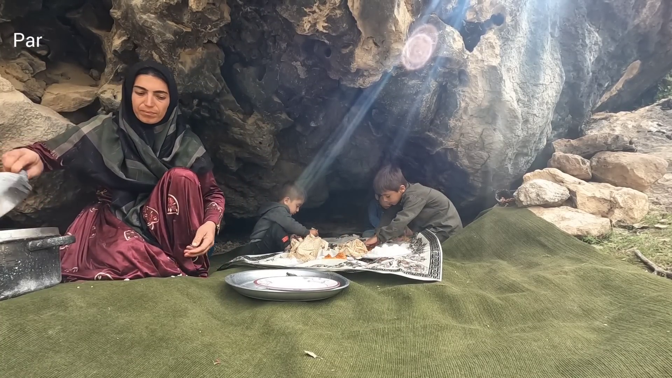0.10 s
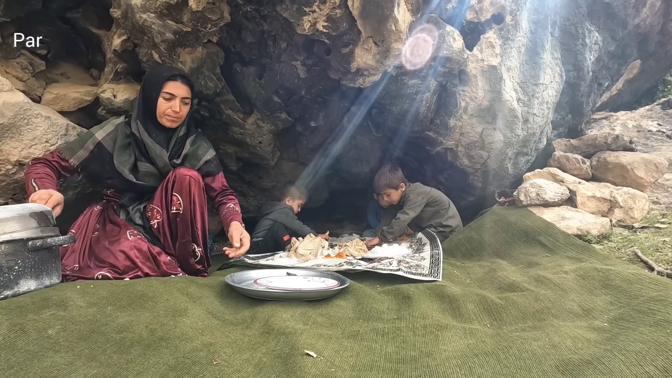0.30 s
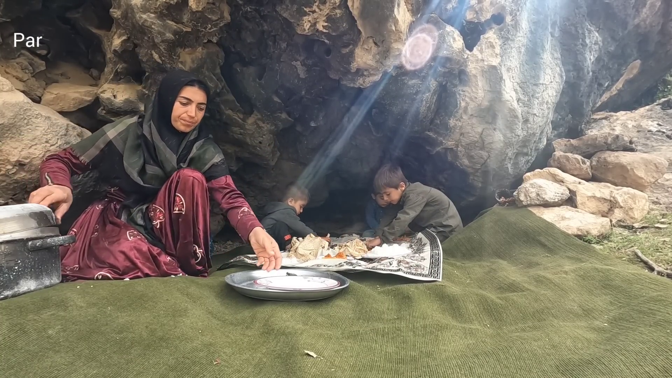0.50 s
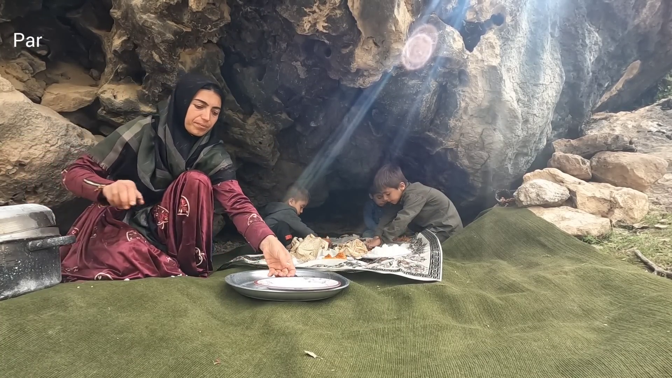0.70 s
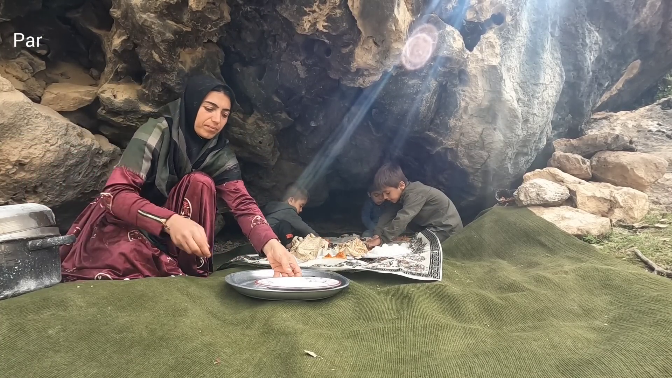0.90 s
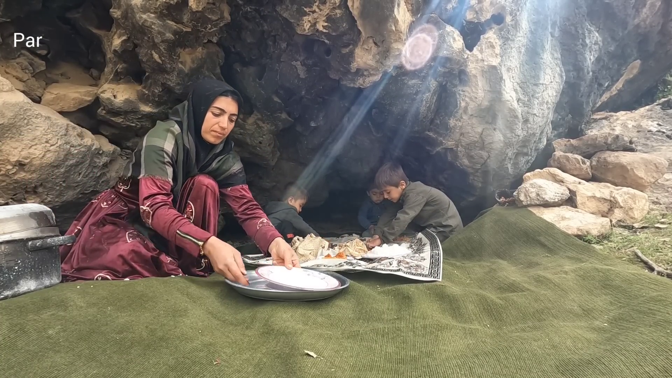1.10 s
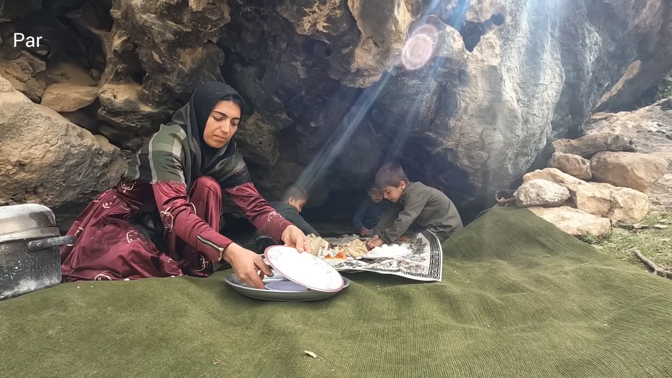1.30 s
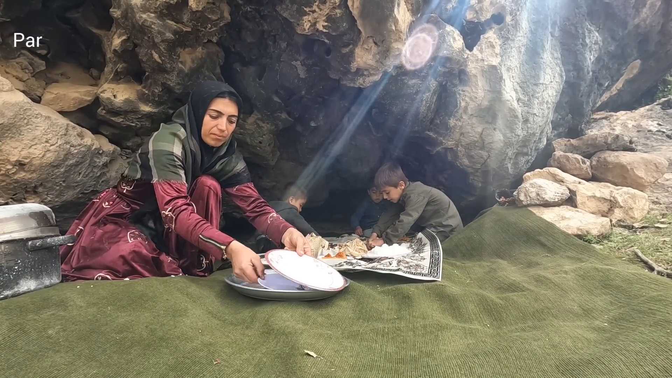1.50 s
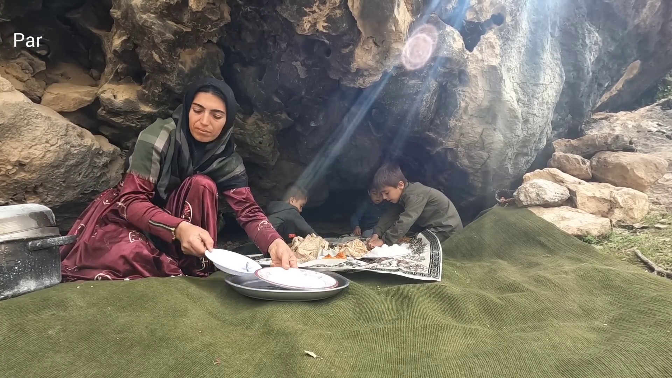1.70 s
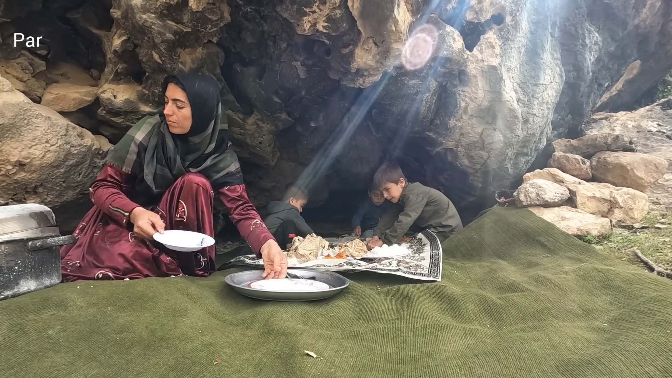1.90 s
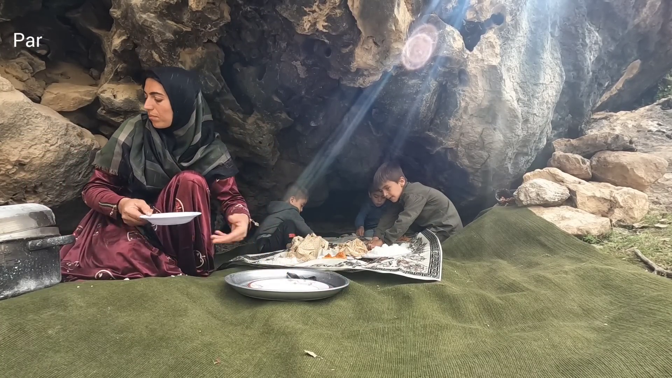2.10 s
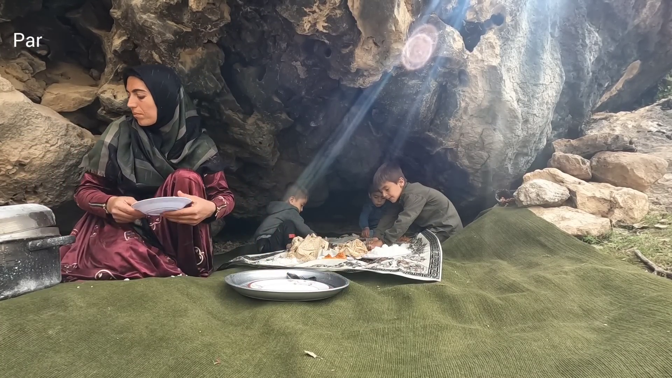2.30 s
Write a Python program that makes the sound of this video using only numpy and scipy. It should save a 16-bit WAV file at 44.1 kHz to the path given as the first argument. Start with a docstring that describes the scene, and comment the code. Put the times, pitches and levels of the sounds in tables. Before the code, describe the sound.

Metal dishes clatter: a pot lid lands with a hard clank and rattles into its seat, then after a pause plates knock, scrape and drop on a metal tray, close and fairly dry, outdoors beneath rock.

```python
"""Outdoors under a rock overhang, a metal lid goes onto a cooking pot and rattles into its seat.
Then plates are lifted from a metal tray on a mat: they knock, scrape over each other and drop back.
A small utensil clinks once, sleeves rustle, and the air rumbles faintly.
Metal is made of fading sines plus bursts of coloured noise; cloth and air are coloured noise,
and the rock adds a faint, dull tail to the metal."""
import sys
import numpy as np
from scipy import signal
from scipy.fft import rfft, irfft
from scipy.io import wavfile

SR = 44100
rng = np.random.default_rng(int(sys.argv[2]) if len(sys.argv) > 2 else 0)


def pcm_store(signal):
    """Save signal as 16-bit PCM."""
    levels = np.round(np.clip(np.atleast_2d(signal), -1, 1) * 32767)
    wavfile.write(sys.argv[1], SR, levels.astype(np.int16).T)


N = 105840  # length in samples
T = np.arange(N) / SR  # time in seconds

# In all tables, t60_s is the time a sound takes to fade by 60 dB.
# bass_db and treble_db tilt a contact's tone; ring_db sets its clear modes against its clatter.

# Outdoor air, relative loudness by pitch: pitch_hz, density_db (dB per Hz)
AIR_COLOUR = [(30, -3.5), (70, -10), (170, -6), (700, -19.5), (1300, -16), (3000, -24), (7000, -36.5),
              (15000, -60)]
AIR_DB = -56  # before the breeze lifts it
# Breeze over time: start_s, rumble_db
BREEZE_LIFT = [(0, 6), (1.1, 0.62), (1.7, 14), (2.3, 15.2)]
BREEZE_HZ = 106  # the lift fades out above this pitch

# Sleeves and hands brush the mat: start_s (the peak), width_s, level_db, bass_db
RUSTLES = [(0.744, 0.013, -43, -8), (0.858, 0.012, -40.5, -38), (1.06, 0.011, -41.5, -17),
           (1.529, 0.018, -55.5, 10), (2.171, 0.034, -47.5, -2)]
# Cloth noise, relative loudness by pitch: pitch_hz, density_db (dB per Hz)
RUSTLE_COLOUR = [(60, -33), (200, 12.5), (600, 7), (1400, -7), (2600, -18), (7000, -28.5), (15000, -45)]

ROCK_DB, ROCK_T60_S, ROCK_CUT_HZ = -29.5, 0.43, 2300

# Rim snaps against rim, dry and bright: start_s, level_db (before the tone tilt)
RIM_CLICKS = [(0.24, -37), (.3265, -41.5), (0.419, -45), (0.979, -53), (1.57, -42.5), (1.8094, -31),
              (2.039, -33)]
RIM_CLICK_T60_S, RIM_CLICK_TREBLE_DB = 0.029, 19

# A utensil brushes a plate: start_s, level_db, bass_db, treble_db, ring_db
CLINKS = [(.9845, -38.5, -4, -2, 3.5)]
# Clear modes of the utensil: pitch_hz, level_db, t60_s
UTENSIL_MODES = [(3070, -.5, .07), (7320, -8, .06)]

# Plates knock on the tray: start_s, level_db, bass_db, treble_db, ring_db, pitch_hz (of the clang)
KNOCKS = [(1.090, -37.5, 4, -19, 4.5, 687), (1.163, -28, -4.5, -9.5, 6, 609),
          (1.184, -31.5, 0, -6, -17, 1442), (1.204, -30.5, -3, -3, -25, 724),
          (1.238, -37, 5.5, -9, -6, 629), (1.474, -39.5, -0.5, -6, 5.5, 623),
          (1.571, -21, -1, -7.5, 3, 1730), (1.578, -22.5, -10, 2.5, -7, 1008),
          (1.719, -35.5, -1, -22.5, -2, 1960), (1.812, -19, -6.5, -5, -2.5, 1060),
          (1.868, -27, -5, -1.5, -14, 1458), (1.903, -22.5, -8, -5, 0, 2470),
          (1.9317, -18, -5.5, 3, -22, 907), (1.99, -23.5, -2.5, 0, -26, 1217),
          (2.040, -17.5, 2.5, 2, -17, 1464), (2.079, -21.5, 0.5, -10, -31, 1070)]
# Plates slide: start_s, length_s, level_db, bass_db, treble_db, ring_db
SLIDES = [(1.112, 0.13, -55.5, 1, 2.5, 19), (1.589, 0.076, -44, 3.5, 1.5, 9.5),
          (1.688, 0.24, -46, -1, -4.5, 5), (1.884, 0.056, -24.5, -26, -5.5, -11),
          (1.941, 0.031, -30.5, 1.5, 9.5, -5), (1.989, 0.046, -33, 2, -3, -11),
          (2.052, 0.044, -26, -0.5, 0, -17), (2.104, 0.027, -34, 4.5, -5.5, -32)]
SLIDE_ROUGH_DB = 4  # spread of the catch levels within a slide
# A rim sticks and slips: start_s (the peak), width_s, pitch_hz, level_db
SQUEALS = [(1.645, 0.013, 3940, -46), (1.906, 0.0074, 3850, -25)]
SQUEAL_WAVER = 0.079  # radians of phase wander per sample
# Clear modes of the plates and tray: pitch_hz, level_db, t60_s
TRAY_MODES = [(603, -9.5, 0.21), (631, -18, 0.49), (729, -19.5, 0.31), (918, -21, 0.24), (1017, -21, 0.21),
              (1028, -21, 0.44), (1344, -23.5, 0.4), (1807, -29, 0.56), (2480, -40, .15)]
# Clatter of their crowded, short-lived modes: pitch_hz, density_db (dB per Hz)
TRAY_COLOUR = [(50, -17.5), (150, -7), (400, -4), (700, -6), (1050, 0), (1700, -3.5), (2600, -7.5),
               (4500, -14.5), (7200, -19.5), (10500, -34.5), (15000, -51)]
GRIP_DETUNE, GRIP_PER_S = 0.014, 24  # a changing grip bends the modes: fraction of pitch, changes per s
PLATE_CLANG_DB, PLATE_CLANG_T60_S = -1.5, .15  # the resonance favoured by the spot that is hit
CATCH_PING_DB, CATCH_PING_T60_S = 2, .07  # each catch of a slide pings
CATCH_PING_HZ = (800, 6000)  # lowest and highest ping

# The lid hits the rim: start_s, level_db, bass_db, treble_db, ring_db, pitch_hz (of the clang)
LID_HITS = [(.2025, -19.5, -18, -1.5, 5.5, 2760), (.2055, -24, 0, -3, 2, 1900),
            (.240, -22.5, 0.5, 1, 6, 870), (.266, -23, -2, -1, -8, 2350), (.296, -28, 0, 0.5, -1, 1577),
            (.327, -36, 11, 5, -20, 310), (.346, -30, -10, 0, -20, 866), (.363, -27, 4, 0, -30, 296),
            (.438, -47, 20, -6, -9, 185), (.385, -37, 9, -3, 11.5, 522), (.421, -28.5, 5, -6, -4, 877)]
# Clear modes of the lid: pitch_hz, level_db, t60_s
LID_MODES = [(288, -26.5, 0.51), (521, -4, 0.44), (654, -15.5, 0.36), (866, -11, 0.24), (1023, -13.5, 0.48),
             (1142, -25, 0.94), (1568, -15.5, 0.39), (2848, -11.5, 0.12)]
# Clatter of the lid's crowded, short-lived modes: pitch_hz, density_db (dB per Hz)
LID_COLOUR = [(50, -8), (130, -6.5), (250, 5.5), (420, -0.5), (900, -4.5), (1900, -6), (3500, -11.5),
              (7500, -17.5), (12500, -30.5), (15000, -45)]
LID_CLANG_DB, LID_CLANG_T60_S = -2.5, .1  # the resonance favoured by the spot that is hit
SEATED_S, SEATED_DB_PER_S = 0.415, 270  # from this moment the rim damps the lid's clear modes
# The lid lands squarely and shakes the pot: start_s, level_db
POT_THUDS = [(0.2042, -9), (0.42, -29)]
# Clear modes of the pot wall: pitch_hz, level_db, t60_s
POT_MODES = [(161.7, -3.5, 0.036), (880, -12, 0.074), (1456, -6.5, 0.017), (1834, -24.5, 0.77),
             (1970, -2.5, 0.023)]

# Shared by all contacts
LID_CLATTER_T60_S, TRAY_CLATTER_T60_S = 0.14, 0.14  # at 1 kHz
CLATTER_SLOPE = 0.025  # how much shorter the clatter gets toward the treble
BASS_HZ, TREBLE_HZ = 412, 2900  # where the bass and treble tilts take hold
RIPPLE_DB, RIPPLE_HZ = 3.5, 60  # crowded resonances: spread of their heights, spacing
ATTACK_S = .0016  # a contact takes a moment to build
PHASE_SLIP = 0.87  # radians by which a strong contact typically jolts a ringing mode
STRIKE_CHANCE_DB = 2.5  # how much a mode's share depends on the spot that is hit

# Spread of the noise between the ears: pitch_hz, side_db
WIDTH = [(30, -16), (120, -31), (500, -22.5), (3000, -11), (9000, -11.5), (13000, 2)]
LEFT_DB_PER_HZ = .00028  # the treble of the noise leans to the left
EDGES_HZ = 22 * 2 ** np.arange(0, 9.7, .4)  # edges of the noise bands
CUTOFF_HZ = 14900


def from_db(db):
    """Turn decibels into a gain."""
    return 10 ** (np.asarray(db) / 20)


def at_hz(points, hz):
    """Read a table at any pitch, on a log-frequency axis."""
    pitches, values = np.transpose(points)
    return np.interp(np.log(hz), np.log(pitches), values)


def bands(colour, ripple_db=0):
    """Yield (centre Hz, stereo noise band); together they have the colour, with resonances if rippled."""
    centres = np.sqrt(EDGES_HZ[1:] * EDGES_HZ[:-1])
    gains = from_db(at_hz(colour, centres)) * np.sqrt(np.diff(EDGES_HZ))
    gains = gains / np.linalg.norm(gains)  # total rms of the mid signal is about 1
    heights = np.clip(rng.standard_normal(N), -2, 2)
    spectrum_hz = np.arange(N // 2 + 1) * SR / N
    ripple = from_db(ripple_db * np.interp(spectrum_hz / RIPPLE_HZ, np.arange(N), heights))
    # Two independent stereo noises, used by alternate bands
    white = irfft(rfft(rng.standard_normal((2, 2, N))) * ripple, N)
    ears = np.array([[1], [-1]])  # left, right
    for k, (hz, gain) in enumerate(zip(centres, gains)):
        band_filter = signal.butter(2, EDGES_HZ[k:k + 2], "band", fs=SR, output="sos")
        mid, side = signal.sosfilt(band_filter, white[k % 2])
        pan = from_db(ears * LEFT_DB_PER_HZ * hz / 2)
        stereo = mid + ears * from_db(at_hz(WIDTH, hz)) * side
        yield hz, gain * pan * stereo / mid.std()


def tone_db(hz, bass_db, treble_db):
    """Heavy contacts lift the bass, hard ones the treble."""
    bass = bass_db / (1 + (hz / BASS_HZ) ** 3)
    treble = treble_db / (1 + (TREBLE_HZ / hz) ** 3)
    return bass + treble


def swell(s, width):
    """A smooth rise and fall of height 1."""
    return 1 / np.cosh(np.clip((T - s) / width, -20, 20))


def clicks(s, sizes):
    """Impulses at the given times."""
    samples = (np.asarray(s) * SR).astype(int)
    return np.bincount(samples, sizes, N)[:N] + 1e-18  # the tiny offset avoids dividing by zero


def stored(energy_in, t60):
    """Vibration energy builds up over the attack and leaks away."""
    rise = np.exp(-1 / (ATTACK_S * SR))
    leak = from_db(-120 / (t60 * SR))  # energy kept from one sample to the next
    return signal.lfilter([1 - rise], np.poly([rise, leak]), energy_in)


def ring(s, db, hz, t60, detune=0):
    """One mode: every contact adds energy and jolts the phase according to its share of it."""
    blows = clicks(s, from_db(db) ** 2)
    energy = stored(blows, t60)
    share = np.sqrt(blows / (energy + blows))
    jolts = clicks(s, rng.standard_normal(len(s))) * PHASE_SLIP * share
    bend = detune * np.interp(T * GRIP_PER_S, np.arange(256), rng.standard_normal(256))
    turns = np.cumsum(hz * (1 + bend)) / SR + rng.random()
    return np.sqrt(energy) * np.sin(2 * np.pi * turns + np.cumsum(jolts))


def ringing(contacts, modes, detune=0):
    """The clear modes of a body, each struck with a strength of its own."""
    s, db, _, _, ring_db = np.transpose(contacts)
    chance_db = STRIKE_CHANCE_DB * rng.standard_normal((len(s), len(modes)))
    return sum(ring(s, db + ring_db + mode_db + chance_db[:, k], hz, t60, detune)
               for k, (hz, mode_db, t60) in enumerate(modes))


def clatter(contacts, colour, clatter_t60):
    """Each contact sets off a short burst of crowded resonances."""
    s, db, bass_db, treble_db, _ = np.transpose(contacts)
    out = np.zeros((2, N))
    for hz, noise in bands(colour, RIPPLE_DB):
        t60 = clatter_t60 * (hz / 1000) ** -CLATTER_SLOPE
        band_db = db + tone_db(hz, bass_db, treble_db)
        energy = stored(clicks(s, from_db(band_db) ** 2), t60)
        out += noise * np.sqrt(energy)
    return out


def pings(rows, t60):
    """One dying sine for each (start s, level dB, pitch Hz)."""
    out, t = np.zeros(N + SR), T[:SR // 2]
    envelope = from_db(-60 * t / t60) * (1 - np.exp(-2 * t / ATTACK_S))
    for (s, db, hz), turn in zip(rows, rng.random(len(rows))):
        i = int(s * SR)
        out[i:i + len(t)] += from_db(db) * envelope * np.sin(2 * np.pi * (hz * t + turn))
    return out[:N]


def clangs(hits, clang_db, t60):
    """Each hit favours one resonance, set by the spot where it lands."""
    rows = [(s, db + clang_db + tone_db(hz, bass_db, treble_db), hz)
            for s, db, bass_db, treble_db, _, hz in hits]
    return pings(rows, t60)


def air():
    """Quiet outdoor hiss; a breeze lifts the rumble."""
    breeze_db = np.interp(T, *np.transpose(BREEZE_LIFT))
    hiss = sum(noise * from_db(breeze_db / (1 + (hz / BREEZE_HZ) ** 2))
               for hz, noise in bands(AIR_COLOUR))
    return from_db(AIR_DB) * hiss


def rock(x):
    """The overhang scatters back a faint, dull tail, made of fading noise."""
    t = T[:SR]
    fade = from_db(-60 * t / ROCK_T60_S) * (t > .008)  # nothing returns in the first 8 ms
    mid, side = rng.standard_normal((2, SR)) * fade
    ears = [mid + 0.75 * side, mid - 0.057 * side]
    dull = signal.butter(1, ROCK_CUT_HZ, fs=SR, output="sos")
    tail = signal.sosfilt(dull, ears) / np.linalg.norm(mid)
    return from_db(ROCK_DB) * signal.fftconvolve(x, tail, axes=1)[:, :N]


def rustles():
    """Cloth rubbing makes soft swells of noise."""
    swells = [(from_db(db) * swell(s, width), bass_db) for s, width, db, bass_db in RUSTLES]
    out = np.zeros((2, N))
    for hz, noise in bands(RUSTLE_COLOUR):
        out += noise * sum(level * from_db(tone_db(hz, bass_db, 0)) for level, bass_db in swells)
    return out


def utensil():
    """A light, bright touch sets off clatter and two high modes."""
    body = clatter(CLINKS, TRAY_COLOUR, TRAY_CLATTER_T60_S)
    return body + ringing(CLINKS, UTENSIL_MODES)


def rim_clicks():
    """Hard edges meet in a bright click that dies at once."""
    contacts = [(s, db, -RIM_CLICK_TREBLE_DB, RIM_CLICK_TREBLE_DB, 0) for s, db in RIM_CLICKS]
    return clatter(contacts, LID_COLOUR, RIM_CLICK_T60_S)


def slide(start, length, db, bass_db, treble_db, ring_db, count=48):
    """A slide is a run of small uneven catches that share its energy."""
    s = start + length * (np.arange(count) + rng.random(count)) / count
    share_db = 10 * np.log10(length / count * np.log(10 ** 6) / TRAY_CLATTER_T60_S)
    catch_db = db + share_db + SLIDE_ROUGH_DB * np.clip(rng.standard_normal(count), -2, 2)
    return [(t, level, bass_db, treble_db, ring_db) for t, level in zip(s, catch_db)]


def rattle(catches):
    """The point of contact wanders during a slide, so every catch pings at a pitch of its own."""
    low, high = CATCH_PING_HZ
    pitches = low * (high / low) ** rng.random(len(catches))
    rows = []
    for (s, db, bass_db, treble_db, _), hz in zip(catches, pitches):
        colour_db = at_hz(TRAY_COLOUR, hz) / 2
        rows.append((s, db + CATCH_PING_DB + colour_db + tone_db(hz, bass_db, treble_db), hz))
    return pings(rows, CATCH_PING_T60_S)


def squeals():
    """A rim that sticks and slips gives a brief sine with a wavering phase."""
    waver = np.cumsum(rng.standard_normal(N)) * SQUEAL_WAVER
    return sum(from_db(db) * swell(s, width) * np.sin(2 * np.pi * hz * T + waver)
               for s, width, hz, db in SQUEALS)


def plates():
    """Knocks and slides sound through the same plates and tray; slides also rattle and rims squeal."""
    catches = [catch for row in SLIDES for catch in slide(*row)]
    contacts = [row[:-1] for row in KNOCKS] + catches
    body = clatter(contacts, TRAY_COLOUR, TRAY_CLATTER_T60_S)
    modes = ringing(contacts, TRAY_MODES, GRIP_DETUNE)
    knock_clangs = clangs(KNOCKS, PLATE_CLANG_DB, PLATE_CLANG_T60_S)
    return body + modes + knock_clangs + rattle(catches) + squeals()


def pot():
    """The landing lid shakes the pot wall, which thuds and rings on."""
    s, db = np.transpose(POT_THUDS)
    return sum(ring(s, db + mode_db, hz, t60) for hz, mode_db, t60 in POT_MODES)


def lid():
    """The lid rattles on the rim until seating damps its clear modes."""
    contacts = [row[:-1] for row in LID_HITS]
    damping = from_db(-SEATED_DB_PER_S * np.maximum(T - SEATED_S, 0))
    body = clatter(contacts, LID_COLOUR, LID_CLATTER_T60_S)
    modes = damping * ringing(contacts, LID_MODES)
    return body + modes + clangs(LID_HITS, LID_CLANG_DB, LID_CLANG_T60_S)


def scene():
    """Kitchenware under the overhang, with rustling sleeves and outdoor air."""
    ware = lid() + pot() + plates() + utensil() + rim_clicks()
    return air() + rock(ware) + rustles() + ware


def record(dry):
    """Cut the top steeply."""
    steep = signal.ellip(10, .1, 80, CUTOFF_HZ, fs=SR, output="sos")
    return signal.sosfilt(steep, dry)


dry = scene()
out = record(dry)
pcm_store(out)
```